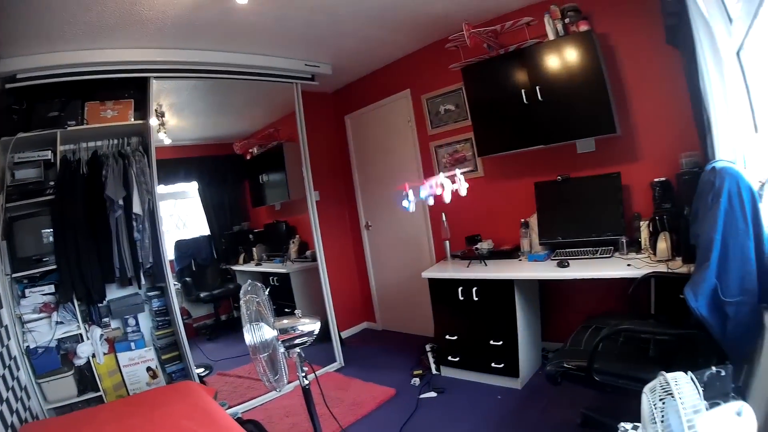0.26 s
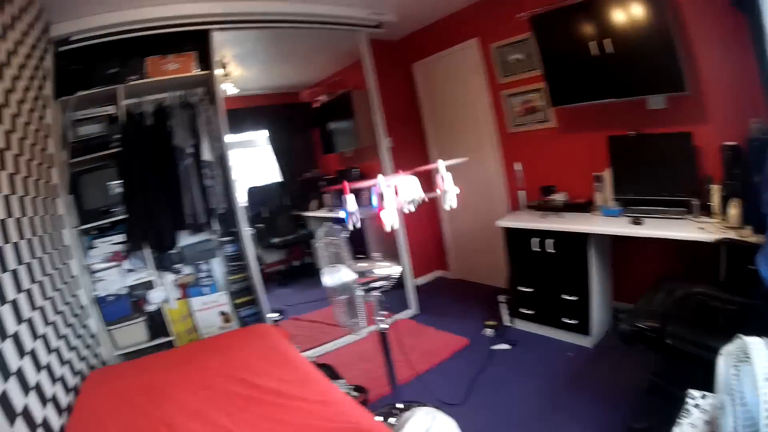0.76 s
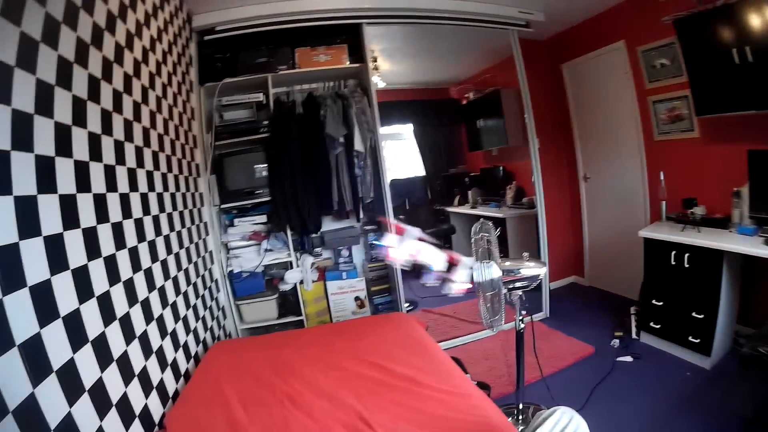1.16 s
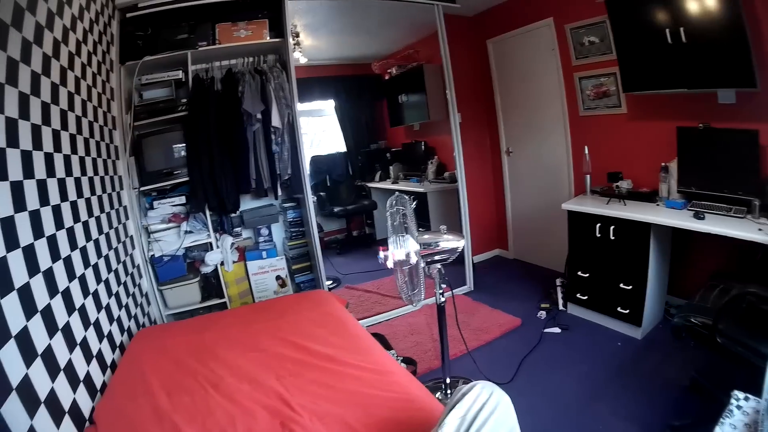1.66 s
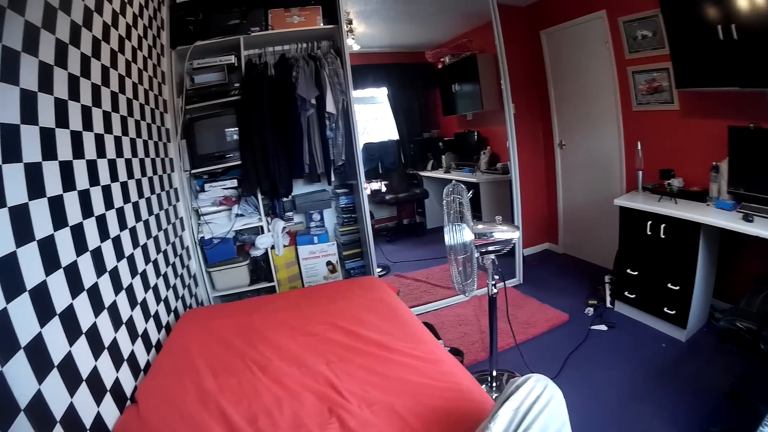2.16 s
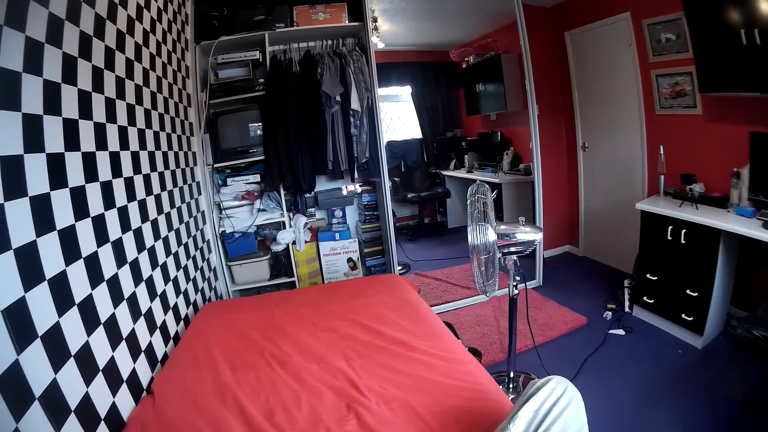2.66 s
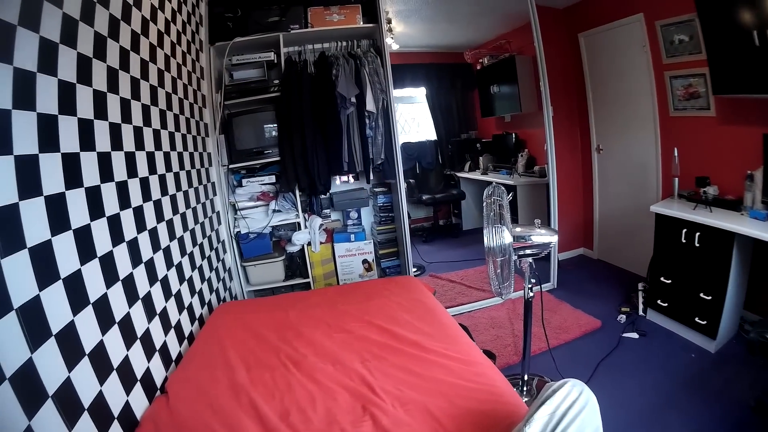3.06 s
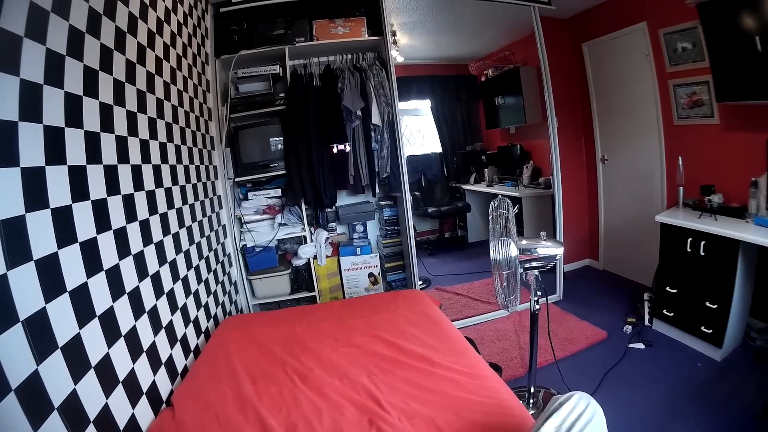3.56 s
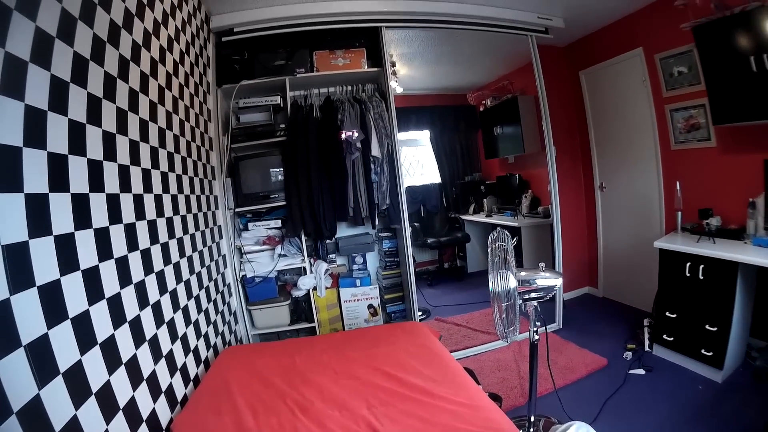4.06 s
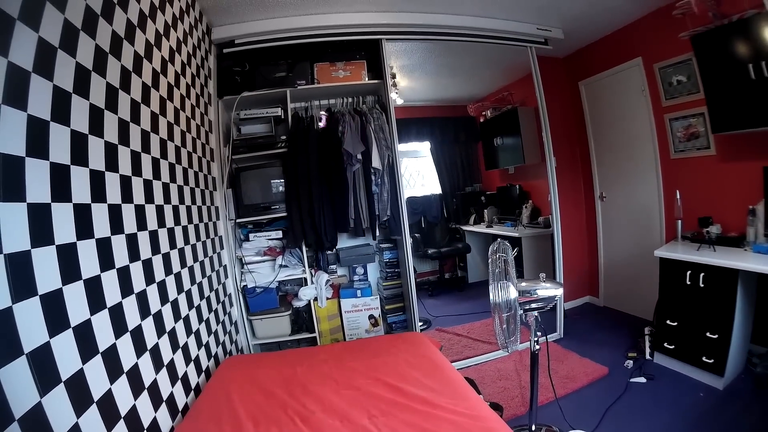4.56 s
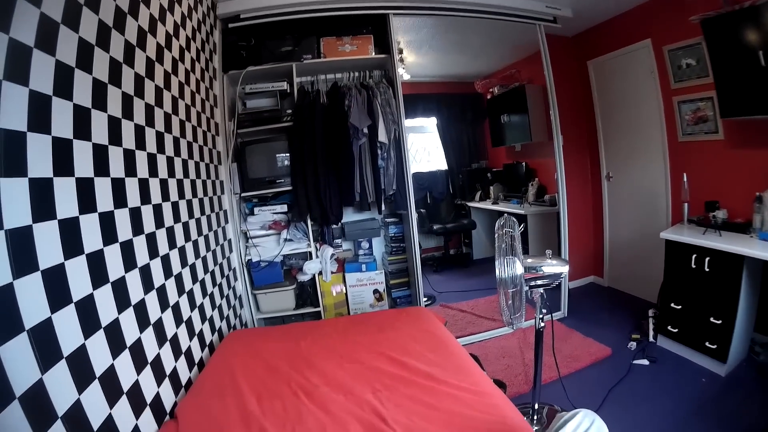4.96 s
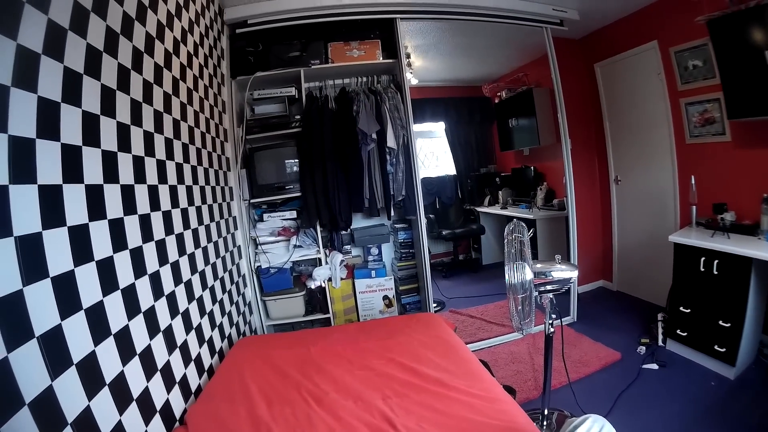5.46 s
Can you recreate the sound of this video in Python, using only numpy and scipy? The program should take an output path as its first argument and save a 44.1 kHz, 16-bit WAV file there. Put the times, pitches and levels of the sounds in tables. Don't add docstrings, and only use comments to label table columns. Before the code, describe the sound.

High, wavering buzz of a toy quadcopter sweeps close, drops to a dull far whine, bursts up in pitch and stops.

```python
import sys
import numpy as np
from scipy import signal
from scipy.fft import rfft, irfft
from scipy.io import wavfile
from scipy.ndimage import uniform_filter1d

SR = 44100
rng = np.random.default_rng(int(sys.argv[2]) if len(sys.argv) > 2 else 0)


def voltage_ratio(level):
    return 10 ** (np.asarray(level, float) / 20)


def bounce(signal):
    frames = np.transpose(np.atleast_2d(signal))
    limited = np.clip(frames, -1, 1)
    pcm = np.round(limited * 32767).astype(np.int16)
    wavfile.write(sys.argv[1], SR, pcm)


N = 252469


def evened(x):
    return x / np.sqrt(np.mean(x ** 2) + 1e-20)


def curves(rows):
    s, *columns = np.transpose(rows)
    return [np.interp(np.arange(N) / SR, s, column) for column in columns]


def bumps(rows):
    out = np.zeros((len(rows[0]) - 2, N))
    for middle_s, length_s, *heights in rows:
        first = max(round((middle_s - length_s / 2) * SR), 0)
        size = round(length_s * SR)
        out[:, first:first + size] += np.outer(heights, np.hanning(size))
    return out


def read(points, hz):
    f, value = np.transpose(points)
    return np.interp(np.log(hz + 1), np.log(f + 1), value)


def coloured(x, spectrum):
    gain = voltage_ratio(read(spectrum, np.fft.rfftfreq(N, 1 / SR)))
    return irfft(rfft(x) * gain, N)


def drift(hz, shape=lambda z: z):
    step = 64
    z = rng.standard_normal(N // step + 2)
    r = np.exp(-2 * np.pi * hz * step / SR)
    for _ in range(2):
        z = signal.lfilter([1 - r], [1, -r], z)
    return np.interp(np.arange(N) / step, np.arange(len(z)), shape(evened(z)))


def noise(spectrum, patchy_db):
    frames, hz = N // 256 + 5, np.fft.rfftfreq(1024, 1 / SR)
    a, b, patches = rng.standard_normal((frames, 513, 3)).T
    patches = uniform_filter1d(patches, size=10, axis=0)
    patches = evened(uniform_filter1d(patches, size=12, axis=1))
    z = (a + 1j * b) * voltage_ratio(read(spectrum, hz)[:, None] + patchy_db * patches)
    return evened(signal.istft(z, nperseg=1024, noverlap=768)[1][:N])


def room():
    # pitch_hz [Hz], level_db [dB per Hz]
    rumble_spectrum = [(40, -0.5), (62, 8), (130, -1.5), (170, -3.5), (330, 1.5), (500, -6.5), (900, -5.5),
                       (1800, -8), (2900, -21), (7000, -10.5), (14400, -16.5)]
    # start_s [s], rumble_db [dB], hum_db [dB]
    background = [(0.0, -62.5, -57.5), (5.03, -64.5, -71.5), (5.72, -65, -65.5)]
    # pitch_hz [Hz], width_hz [Hz], level_db [dB]
    fan_tones = [(110, 9, 0), (269, 3, -12), (460, 3, -14)]
    rumble_db, hum_db = curves(background)
    t = np.arange(N) / SR
    hum = 0
    for hz, width_hz, db in fan_tones:
        level = voltage_ratio(db + 3.0 * drift(width_hz))
        hum = hum + level * np.cos(2 * np.pi * hz * t + 0.35 * drift(width_hz))
    return voltage_ratio(rumble_db + 5.5) * noise(rumble_spectrum, patchy_db=0.0) + voltage_ratio(hum_db - 1.5) * hum


def walls(x):
    # pitch_hz [Hz], t60_s [s]
    decay = [(500, 0.42), (2000, 0.39), (10000, 0.37)]
    echoes = np.zeros(SR // 2)
    at = np.arange(200, SR // 2 - 20, 20)
    echoes[at + rng.integers(0, 20, len(at))] = rng.choice([-1., 1.], len(at))
    hz, t, z = signal.stft(echoes, SR, nperseg=256)
    fading = voltage_ratio(-60 * t / read(decay, hz)[:, None])
    tail = signal.istft(z * fading, SR, nperseg=256)[1]
    return signal.fftconvolve(x, tail / np.linalg.norm(tail))[:N]


def stick():
    # start_s [s], level_db [dB], ring_hz [Hz], thud_db [dB], t60_s [s]
    stick_taps = [
        (1.4, -39.5, 1970, -28, .014),
        (1.509, -40, 2050, -27, 0.016),
        (1.8161, -24.5, 1896, -26, 0.012),
        (1.893, -42, 1982, -27, 0.013),
        (1.949, -41, 1610, -6.5, 0.031),
    ]
    out, t = np.zeros(N), np.arange(2000) / SR
    for start_s, db, hz, thud_db, t60_s in stick_taps:
        modes = np.sin(2 * np.pi * hz * t) + 0.35 * np.sin(2 * np.pi * 0.6 * hz * t)
        ring = voltage_ratio(-60 * t / t60_s) * modes
        thud = voltage_ratio(thud_db - 60 * t / 0.028) * np.sin(2 * np.pi * 260 * t)
        onset = np.minimum(t / 0.0021, 1) ** 1.2
        out[round(start_s * SR):][:len(t)] += voltage_ratio(db + 10.0) * (ring + thud) * onset
    return out


def overtones(angle, rough, surge, bright_db, brush_db):
    orders_db = [-2, -25, -5.5, -24, -11, -22, -14, -35, -15, -22, -20, -21, -22, -30, -22.5, -20, -20.5,
                 -26, -28]
    contacts, middle_order = 6, 8
    shaken = angle + .36 * rough * drift(50)
    tilt_db = bright_db - 3.3 * surge
    over = 0
    for k, db in enumerate(orders_db, 4):
        flicker = drift(24, lambda z: voltage_ratio(db + 3.55 * z))
        order_db = tilt_db * (k - middle_order) / 10 + brush_db * (k % contacts == 0)
        over = over + flicker * voltage_ratio(order_db) * np.cos(k * shaken + 2 * np.pi * rng.random())
    return over


def rotor(rows, kicks, near_db, bank_db, bright_db, brush_db, arm_db, once_db, third_db):
    # start_s [s], roughness [0-1]
    gusts = [(0, .13), (.3, .35), (.45, .12), (1.1, .12), (1.25, .5), (1.75, .55), (1.9, .24), (3.1, .22),
             (3.3, .4), (4.3, .35), (4.45, 1), (5.05, .9), (5.25, .55), (5.72, .9)]
    trim_hz, trim_db, toward_db = curves(rows)
    blade_hz, whine_db = [trim_hz, trim_db] + bumps(kicks)
    rough, = curves(gusts)
    shaft_hz = uniform_filter1d(blade_hz, size=500) / 2 * (1 + 0.000561 * drift(20.0))
    angle = 2 * np.pi * (np.cumsum(shaft_hz) / SR + rng.random())

    blade_db = whine_db + 4.0 * rough ** 3 * drift(25) + 1.2 * drift(6)
    whine = voltage_ratio(blade_db) * np.cos(2 * angle + 1.1 * rough ** 4 * drift(30))

    steady_db = uniform_filter1d(whine_db, size=12000)
    steady_db = steady_db - 0.19 * (steady_db - near_db) - 3.5
    turn_db = steady_db + once_db + bank_db + 0.86 * rough * drift(33.0)
    whine += voltage_ratio(turn_db) * np.cos(angle + 0.56 * rough * drift(31.0))
    shake_db = steady_db + third_db + arm_db - 4.5 * rough ** 2 + 2.0 * drift(18.0)
    whine += voltage_ratio(shake_db) * np.cos(3 * angle + 2.4 * rough * drift(25.0))

    surge = uniform_filter1d(abs(np.gradient(shaft_hz)) * SR / 1000, size=1500)
    over = overtones(angle, rough, surge, bright_db, brush_db)
    return np.sqrt(2) * whine, voltage_ratio(1.82 * toward_db - 2.86 * surge) * over, angle


def aircraft():
    # start_s [s], blade_hz [passes, Hz], whine_db [dB], facing_camera_db [dB]
    trim_1 = [(0, 1440, -45.5, -31), (.25, 1196, -54, 3), (.31, 1402, -38, -4), (.5, 1496, -36, -6),
              (.69, 1371, -44, -6), (1.07, 1270, -34.5, -7.5), (1.6, 1301, -41, 0), (1.9, 1386, -50, -3),
              (2.19, 1369, -54, -8), (2.33, 1236, -61.5, 1.5), (2.74, 1288, -52.5, -.7),
              (3.05, 1384, -60, 1.7), (3.349, 1306, -53.5, -18), (4.37, 1309, -57, -10),
              (4.86, 1518, -64, -9), (4.915, 1603, -39, -0.5), (5.45, 1641, -44.5, -4),
              (5.63, 1212, -60.5, -4)]
    trim_2 = [(0, 1403, -47, 3.5), (0.164, 1180, -48.5, -4.4), (.31, 1382, -39, -1.5),
              (.5, 1441, -35.5, -5), (.68, 1315, -40, -6.5), (.9, 1264, -38, -2), (1.19, 1236, -39.5, -3.5),
              (1.6, 1305, -47, -2), (2.09, 1344, -52.5, -0.5), (2.4, 1221, -73, 3), (2.75, 1255, -58, -1),
              (3.04, 1346, -50.5, -6.5), (3.35, 1296, -67, -5.5), (4.36, 1296, -59, -5.5),
              (4.9, 1487, -53.5, -3), (5.0, 1597, -39, -0.2), (5.46, 1585, -47.5, -1),
              (5.63, 1187, -64, -2)]
    trim_3 = [(0, 1068, -70, -6), (.22, 1236, -44.5, -2.5), (0.321, 1154, -60, -3), (.54, 1135, -49.5, -2),
              (.63, 1236, -47, -1.5), (1.03, 1253, -41.5, -9), (1.2, 1208, -47.5, -1),
              (1.45, 1208, -51.5, -11), (1.63, 1334, -66, -1.5), (1.94, 1209, -54, -0.5),
              (2.1, 1312, -47.5, -2.5), (2.401, 1192, -69, -8.5), (3.08, 1314, -57, 0),
              (3.37, 1245, -53.5, -8), (4.38, 1263, -59.5, -12.5), (5.1, 1571, -43.5, -3),
              (5.39, 1562, -44, -3), (5.649, 1167, -66, -8)]
    trim_4 = [(0, 1047, -61, 3), (0.234, 1157, -47.5, -2.5), (0.301, 1027, -60, -1),
              (0.42, 1117, -56.5, -6), (.69, 1171, -46, -6), (1.029, 1166, -51, -6), (1.3, 1174, -51, -2),
              (1.43, 1114, -63, -8.5), (1.66, 1234, -55, -1.5), (2.185, 1211, -54, 0.9),
              (2.25, 1133, -54, 3), (2.48, 1108, -68.5, 0.2), (2.75, 1164, -70, 0.2),
              (3.06, 1237, -59.5, -2), (3.3, 1203, -58.5, -3), (4.63, 1194, -64.5, -2.5),
              (5.34, 1510, -53, -7), (5.72, 1096, -73, -10)]
    # middle_s [s], length_s [s], speed_change_hz [Hz], whine_change_db [dB]
    kicks_1 = [(0.147, .22, 61, 6), (0.364, .11, 76, -2), (0.432, 0.0809, -30.5, -13),
               (0.603, .17, -24.5, 1.5), (0.754, .16, 5, 7), (1.052, 0.1006, 28, 2),
               (1.177, 0.11, 62.5, -1), (1.244, 0.11, -70.5, -14), (1.425, .08, -70, -8.5),
               (1.355, .085, 120, 0.5), (1.502, .2, -155, -16), (1.673, 0.16, 77.5, -8.5),
               (1.809, 0.077, 74.5, 5), (2.028, 0.14, 79.5, 9), (2.531, .16, 34.5, 4.5),
               (2.906, 0.28, -8.5, 8), (3.6, .2, -11.5, 5.5), (3.27, .12, 1.5, 5.5), (3.779, 0.18, 2, 8.5),
               (4.28, .16, 10.5, 1.5), (4.424, .07, 90.5, 2), (4.508, .1, 70, 7), (4.587, .07, 90.5, 7),
               (4.639, .14, 85.5, 3), (4.761, .16, 134.5, 6), (4.952, 0.075, 145.5, 4),
               (4.987, .075, -215, 0.5), (5.081, .12, -105, -6.5), (5.148, 0.11, 100.5, 3.5),
               (5.218, .16, 44.5, -0.5), (5.346, .16, -30.5, -1.5), (5.546, .16, -13.5, -12.5),
               (5.661, 0.084, 4.5, 3)]
    kicks_2 = [(0.074, 0.14, -40, 0), (2.04, .1, -50, 6), (2.115, 0.077, 25, 2), (2.24, .07, 29.5, 7),
               (0.251, 0.11, -87, 1.5), (0.378, .11, -62, -5.5), (.445, 0.05, -0.5, -12), (.6, .1, 10, 0.5),
               (1.085, 0.11, 42, 5.5), (1.246, 0.095, 112, 8), (1.349, 0.078, -75, -8),
               (1.421, .11, 155, 5.5), (1.9, 0.11, 7.5, -8), (2.3, 0.089, 15.5, 2),
               (1.541, .11, 175.5, 10.5), (1.7, 0.098, -72, -2), (1.755, 0.058, 35.5, 5),
               (2.2, 0.12, -41, 11), (2.54, 0.24, 30.5, 5), (3.851, 0.57, -3, 4), (4.436, 0.11, 46.5, 5.5),
               (4.54, .1, -80, 3), (4.602, 0.094, 54, 1), (4.769, 0.099, 97.5, 4), (4.825, 0.09, -175, -3),
               (4.94, 0.084, 135.5, 5), (5.001, 0.062, -41, -6), (5.08, .12, 59.5, -2.5),
               (5.138, 0.083, 14.5, -18), (5.223, 0.14, 28, 2.5), (5.56, 0.15, -32, -16)]
    kicks_3 = [(1.8, .12, -55, 3), (2.02, .13, -30, -6), (.56, 0.0798, -20, -5), (0.116, .2, -45, 5),
               (0.374, 0.087, 52, 9.5), (0.455, 0.0662, 24.5, 10), (.52, 0.086, 0, -3),
               (.77, 0.118, 17.5, 4.5), (1.297, 0.098, 38.5, 6.5), (1.796, 0.1202, 21.5, 14.5),
               (2.7, 0.38, -11.5, -16), (3.54, .36, 14.5, 0), (5, 0.2, -1.5, -10.5), (2.25, 0.11, 1, 12),
               (1.45, 0.098, -24.5, -1), (3.98, 0.047, -0.5, 1.5), (4.32, 0.1604, -20, -6),
               (3.82, 0.17, -2.5, 7), (4.1, 0.3363, -5, 7.5), (4.69, 0.16, -56, -1), (4.89, 0.3, -85, -5),
               (5.219, .2, -58, -3.5)]
    kicks_4 = [(.075, .15, -52, -2), (.62, 0.11, -18.5, 2.5), (.68, 0.069, 12, 4), (.75, 0.072, -12, -3),
               (2.51, 0.081, 24, -3), (3.12, .13, 10, -9), (3.8, 0.19, -8.5, 1), (1.361, .08, -64.5, 1),
               (1.43, .07, -40, 6), (1.125, .06, 7.5, 5), (2.07, .1, 20, -11), (2.31, 0.099, 15, -3),
               (1.512, 0.08, -35.5, 12), (3.44, 0.088, -0.5, -1), (.364, 0.082, -69, 7), (.53, .2, -22, -7),
               (.81, 0.2, 15.5, 3), (1.078, 0.068, 44.5, 9), (1.173, 0.083, 31.5, 6),
               (1.247, 0.078, -59, 3.5), (1.587, .08, -45, 8), (1.811, .1, -70, 9.5),
               (1.95, 0.31, -25.5, -13), (2.58, 0.25, 44, 7), (3.46, 0.21, -12, -12),
               (4.744, 0.11, 30, -0.5), (4.851, 0.13, -76.5, -4), (5.1, 0.19, -51.5, 4),
               (5.218, 0.11, 32.5, -28), (5.45, .15, 44, -2)]
    # once_a_turn_db [dB], third_order_db [dB]
    imbalance = [(-17.5, -19.5), (-16, -19), (-23.5, -14), (-6, -19.5)]
    # start_s [s], rotor_1_db .. rotor_4_db [dB]
    banking = [(0, 3, 8, 4, -18), (.15, -13, 8.5, -10, -11), (.28, 4, -3, 3, -7), (.5, 1.5, -6, 9, -1.5),
               (.75, 1.5, -4, 6, -2), (1.0, -1.5, -4, 7, 1.5), (1.25, 7.5, 1, 0, 2.5),
               (1.4, 10, 1.5, 5, 0.5), (1.6, 7, 6, -4, -8), (1.8, 4, 6, 0, -2), (2.05, -2.5, -8, 2, -3),
               (2.3, -5, 0, -2, -4.5), (2.7, 0, -3.5, -0.5, 4.5), (3.1, 6, -7.5, -4, 0.5),
               (4.4, 1.5, 3, 6, -1), (4.75, 0, 1, 8, -2.5), (5.1, 1, 3.5, -2, -10), (5.72, -11, -2, -9, -2)]
    # start_s [s], rotor_1_db .. rotor_4_db [dB per 10 orders]
    brightness = [(0, 0, 3, 0, -4), (.12, 3, -4, -5, -10), (.3, 3.5, -1, -9, 2), (.55, -2, -7, 8, -2),
                  (.75, -5, -1, 0, -1), (.95, -12, 4, -3, 2), (1.15, 1, 0, 0, -3), (1.5, 2, 5, 1, -2),
                  (1.9, 2, -7, 4, -3), (2.15, -12, 3, 12, 2), (2.45, -2, 4.5, 2, -7), (2.9, -1, 10, 5, 2),
                  (3.25, 2, -20, 8, 5), (3.8, -3, -24, 7, 5), (4.4, -3, 5, 8, 2), (4.95, -13, 2, 4, 2),
                  (5.25, 4, 4, 9, 1), (5.72, 0, 0, 2, -1)]
    # start_s [s], rotor_1_db .. rotor_4_db [dB]
    brushes = [(0, 3, -5.5, -7, 0), (.12, -12, 12, -3, -6), (.3, 7, -14, -3, -10), (.5, -2, -2, -3, 5.5),
               (.7, -4, 12, -3, -1), (.95, -14, -1.5, -1, -4), (1.15, -6, 8, -9, 1),
               (1.5, 3.5, -7, 5.5, 3.5), (1.9, -5, 1, 2.5, 1.5), (2.15, -9, 2, 0, 1.5), (2.45, 6, -3, 2, 0),
               (2.9, 0.5, 2, 3.5, -2), (3.25, -7, -1, 0.5, -4.5), (3.8, -4, -2, 9, -4), (4.4, -2, 3, 4, 0),
               (4.95, -1, -2, -0.5, 0.5), (5.25, -3.5, -5.5, 4.5, 8), (5.72, -0.5, -0.5, 2, -0.5)]
    # start_s [s], rotor_1_db .. rotor_4_db [dB]
    arms = [(0, 2, 5, -6, 0), (.15, -6, -3, -2, 0), (.3, -2, -6, 0, 0), (.55, -12, -10, -2, 12),
            (.8, -11, -3, 1, 0), (1.05, 7, 6.5, 3, 11), (1.3, 6, 9, -4, 0), (1.6, 8, 8, 0, 0),
            (1.9, 9, 5, 11, 2), (2.2, 6, 0, 1, -4), (2.6, -1, 2, 1, 2), (3.0, -9, -7, 1, 2),
            (3.6, 3, -3, 0.5, -6), (4.35, 12.5, 3, 7, -4), (4.75, -3.5, 9, -4, -1.5), (5.0, 3, 7, -3, 0),
            (5.3, -11, -12, -4, 2), (5.72, 2, 0, 6, 0)]
    # start_s [s], hiss_db [dB], edge_on_tip_air_db [dB over hiss], echo_db [dB]
    flight = [(0, -40, -1, -2.5), (.2, -38, -6, -8.5), (.43, -37, -1, -7.5), (1.0, -35, 1, -9),
              (1.4, -34.5, -2.5, -10), (1.76, -39, -4.5, -6), (2.19, -41, -7.5, -7), (2.39, -58, -5, -8),
              (2.9, -51.5, -4.5, -1), (3.2, -52.5, -4.5, -20.5), (4.32, -54.5, -3, -6), (4.6, -52, -17, -7),
              (4.89, -45.5, -14, -8), (4.93, -38, -11.5, -8.5), (5.33, -40, -2, -8), (5.45, -44, -11, -17),
              (5.55, -54, -5, -16), (5.72, -64, -7.5, -15.5)]
    # middle_s [s], length_s [s], hiss_change_db [dB], downwash_change_db [dB]
    surges = [(1.31, 0.1, -2, -3), (1.36, 0.099, 3, -1), (1.52, 0.2, 6, -6), (2.97, 0.32, 2.5, 3.5),
              (3.6, 0.14, 2, 2.5), (3.79, .12, 3.5, 4), (3.97, 0.16, 0.5, -4.5), (4.17, .2, 3, -1),
              (4.53, 0.11, 6, 0), (4.76, 0.17, 6, 1), (4.968, 0.074, 6, 1), (5.0, 0.034, 2, 6.5),
              (5.25, .12, 1.5, 5.5)]
    # pitch_hz [Hz], level_db [dB per Hz]
    hiss_spectrum = [(2000, -8), (4000, 3.5), (14000, -9)]
    wash_spectrum = [(300, -7), (600, -4), (1000, 1.5), (1500, -1), (2000, 6), (2500, -7.5), (2900, -12),
                     (3600, -10)]
    tip_spectrum = [(8500, -13.5), (12000, 11), (15000, -6)]
    # pitch_hz [Hz], gain_db [dB]
    port = [(1500, -20.5), (2500, -22.5), (3000, -21), (3800, -17), (4250, -17.5), (5100, -6.5),
            (7700, -5.5), (8700, -9), (10000, -4.5), (11900, -8.5), (12300, -22), (13300, -7.5),
            (14300, -14.5), (14700, -37)]
    near_db = -40

    hiss_db, edge_db, echo_db = curves(flight)
    surge_db, blast_db = bumps(surges)
    wash_db = -52.5 + 0.73 * (hiss_db - near_db) - 0.53 * edge_db + blast_db
    low = voltage_ratio(wash_db - 4.0) * noise(wash_spectrum, patchy_db=4.0)
    high = voltage_ratio(edge_db - 1.2 * surge_db) * noise(tip_spectrum, patchy_db=-1.0)
    chop = 1
    trims, kicks = (trim_1, trim_2, trim_3, trim_4), (kicks_1, kicks_2, kicks_3, kicks_4)
    attitudes = map(curves, (banking, brightness, brushes, arms))
    for trim, kick, shaft, *heard_db in zip(trims, kicks, imbalance, *attitudes):
        whine, over, angle = rotor(trim, kick, near_db, *heard_db, *shaft)
        low += whine
        high += voltage_ratio(10.5) * over
        chop = chop + 0.11 * np.cos(2 * angle)
    high += chop * noise(hiss_spectrum, patchy_db=3.5)
    flutter_db = 1.0 * drift(50)
    bright_air = voltage_ratio(hiss_db + surge_db + flutter_db - 0.5) * high
    return low + coloured(bright_air, port), voltage_ratio(echo_db)


def scene():
    craft, echo = aircraft()
    taps = stick()
    reflected = walls(echo * craft + 0.39 * taps)
    return (craft + reflected + taps + room())[None]


def masked(x):
    mask_db, hole_db, holes_from_hz = -5.6, -20, 2550
    hz, t, z = signal.stft(x, SR, nperseg=2048, noverlap=1536)
    power = uniform_filter1d(abs(z) ** 2, size=3, axis=-1)
    power = uniform_filter1d(power, size=5, axis=-2)
    level_db = 10 * np.log10(abs(power) + 1e-20)
    hidden = level_db < mask_db + uniform_filter1d(level_db, size=44, axis=-2)
    keep = np.where(hidden & (hz[:, None] > holes_from_hz), voltage_ratio(hole_db), 1)
    return signal.istft(z * keep, SR, nperseg=2048, noverlap=1536)[1][..., :N]


def top_cut(x):
    return signal.sosfilt(signal.butter(12, 14540, fs=SR, output="sos"), x)


def record(dry):
    mix = masked(dry)
    return top_cut(mix)


dry = scene()
out = record(dry)
bounce(out)
```